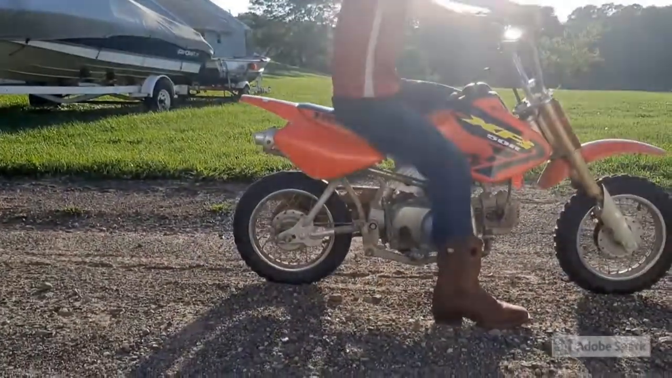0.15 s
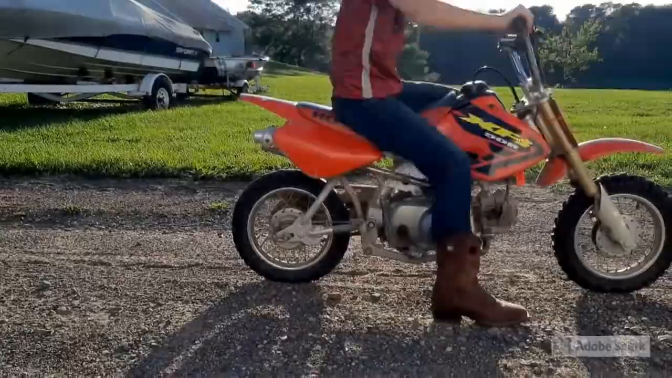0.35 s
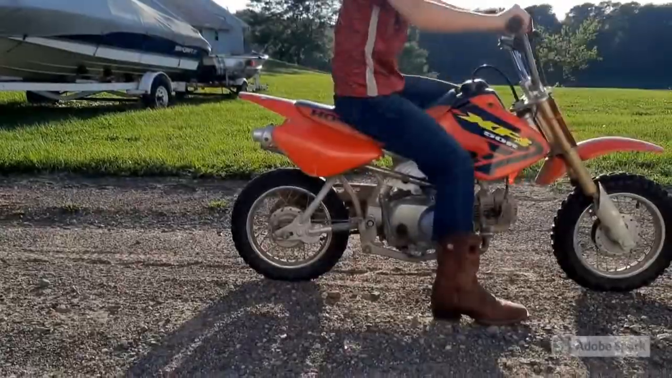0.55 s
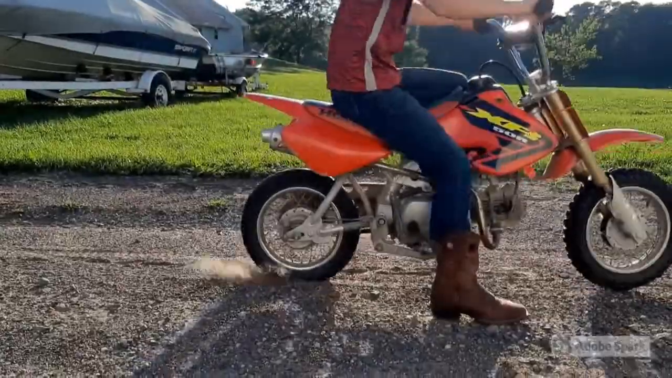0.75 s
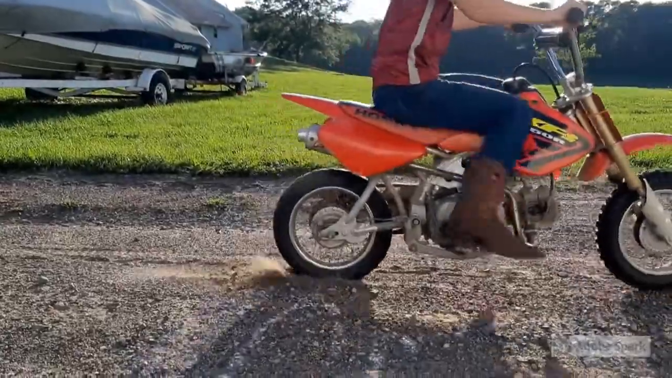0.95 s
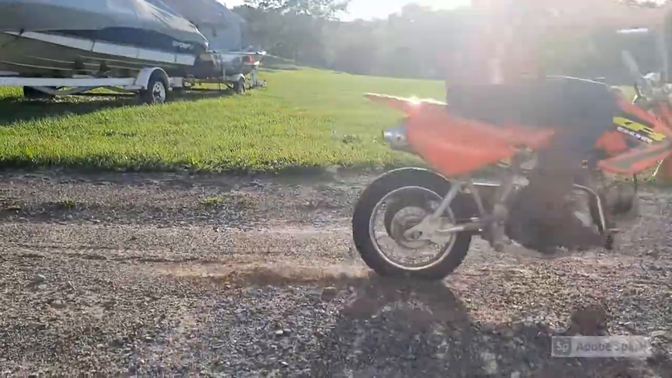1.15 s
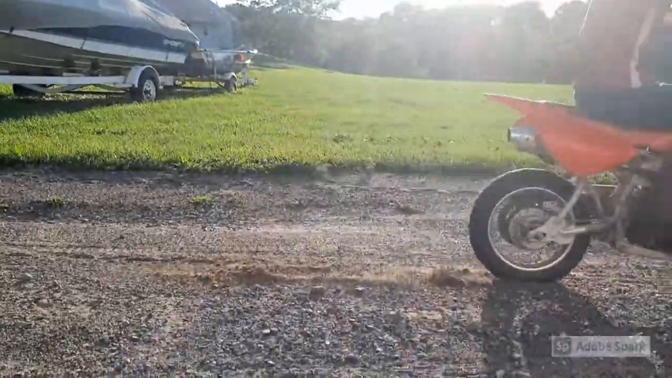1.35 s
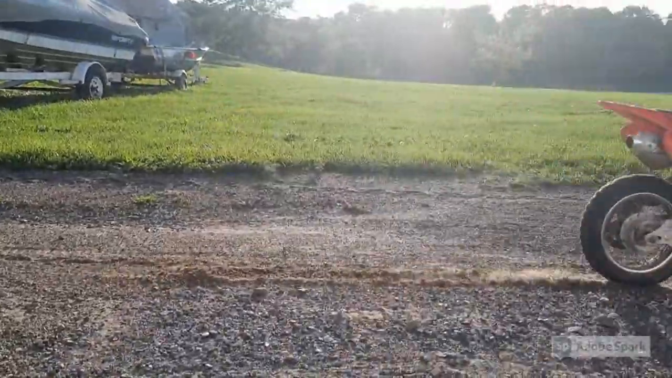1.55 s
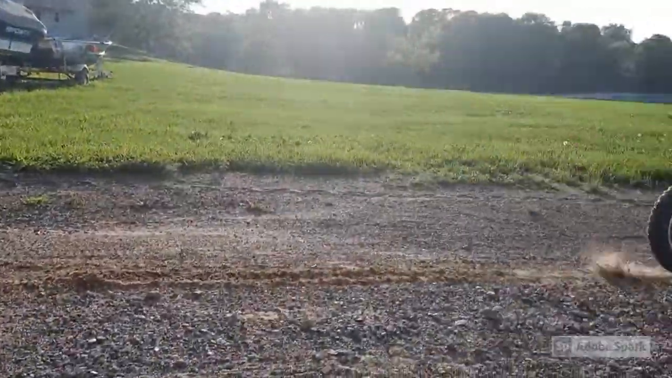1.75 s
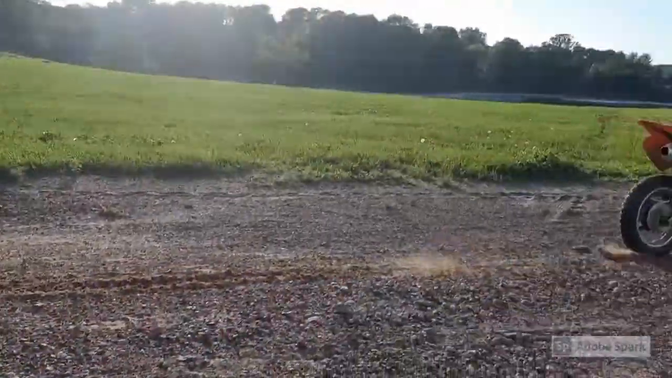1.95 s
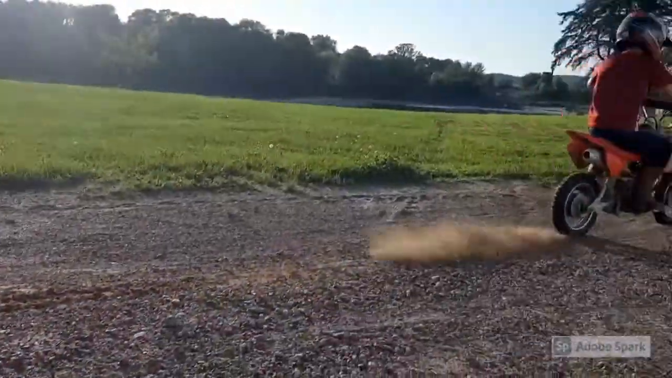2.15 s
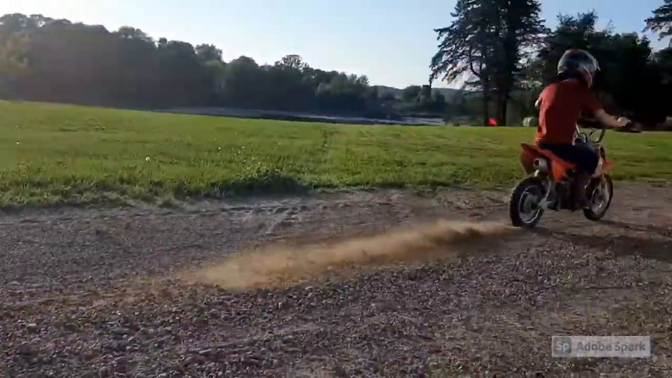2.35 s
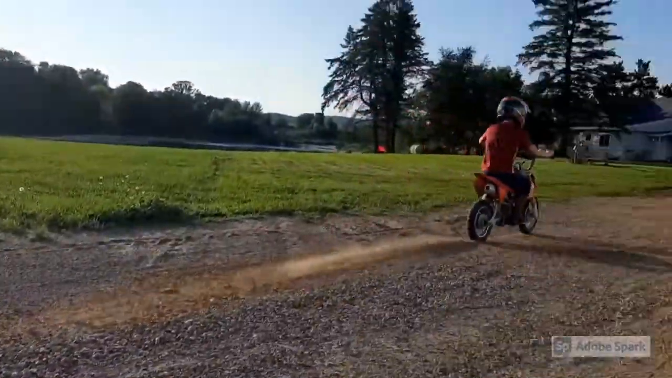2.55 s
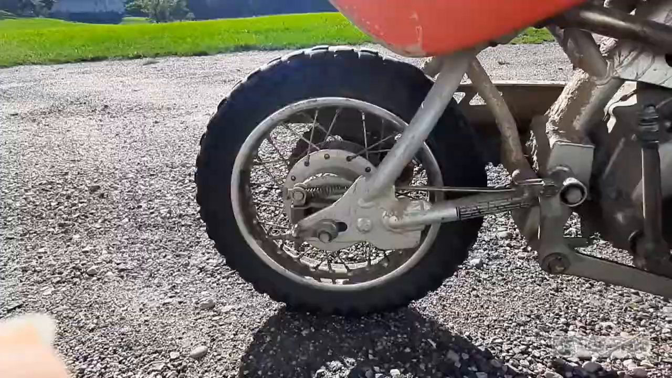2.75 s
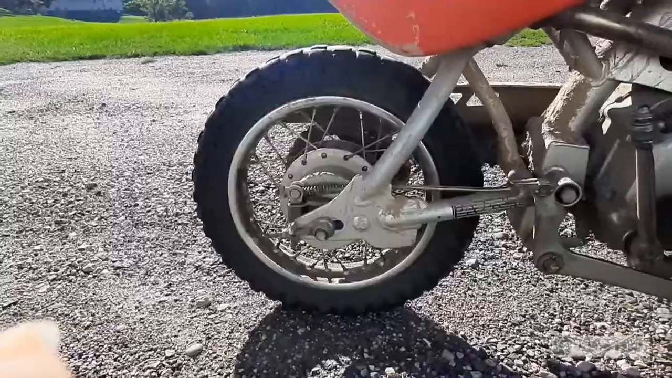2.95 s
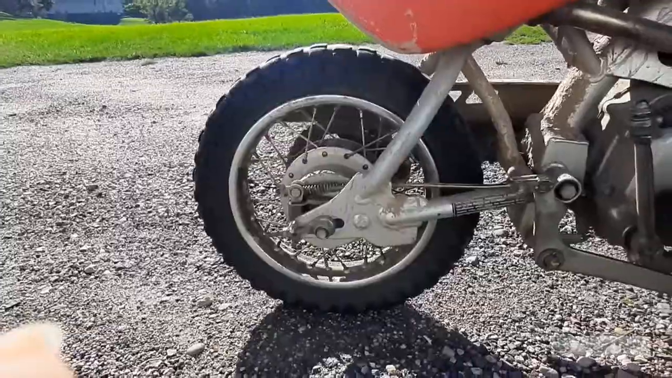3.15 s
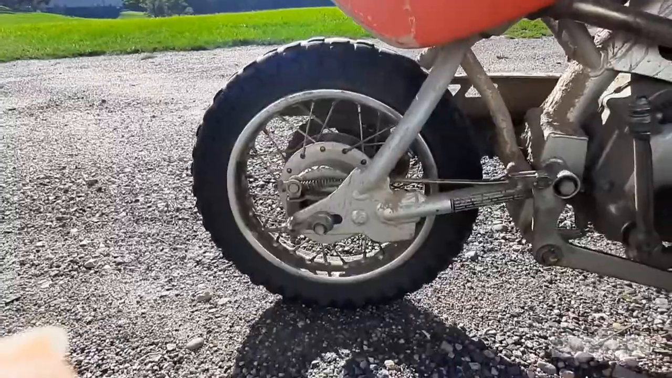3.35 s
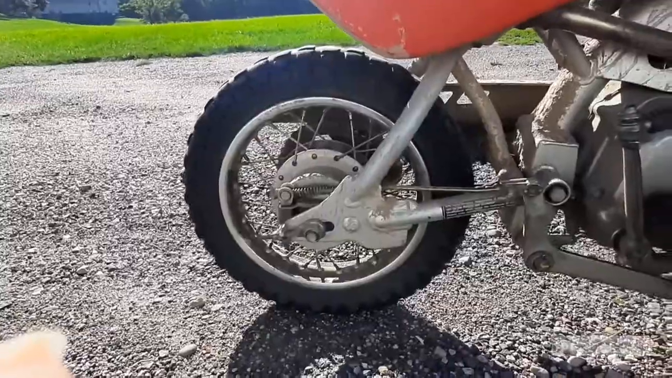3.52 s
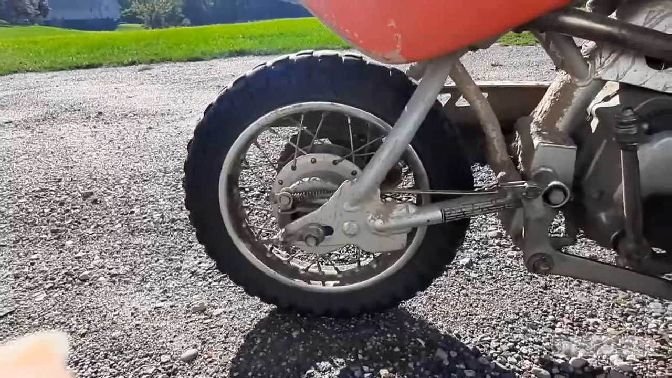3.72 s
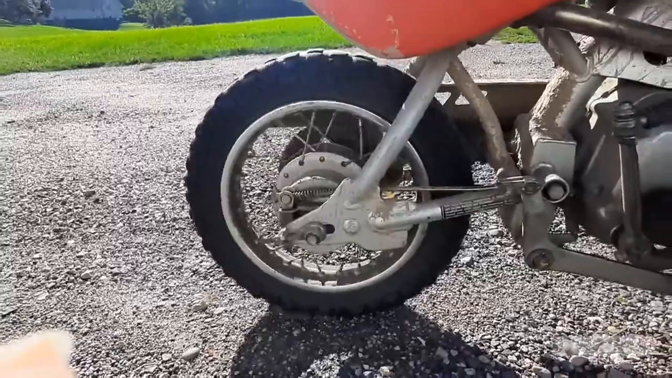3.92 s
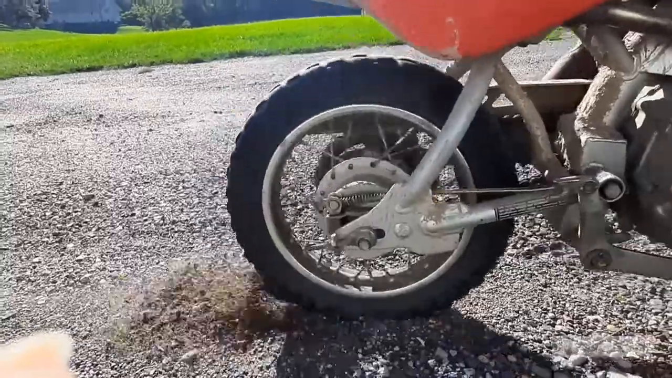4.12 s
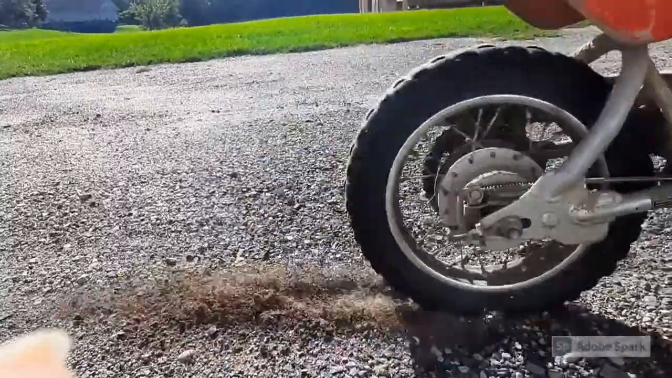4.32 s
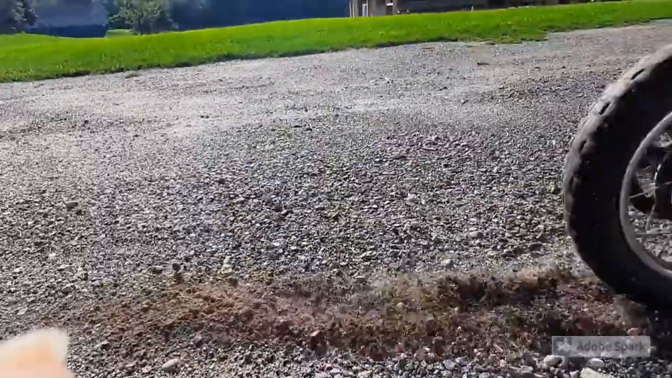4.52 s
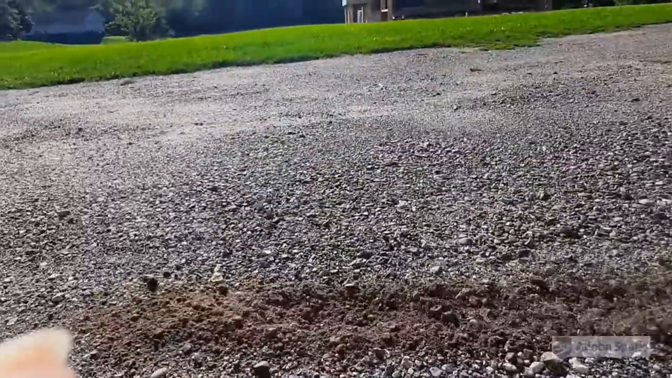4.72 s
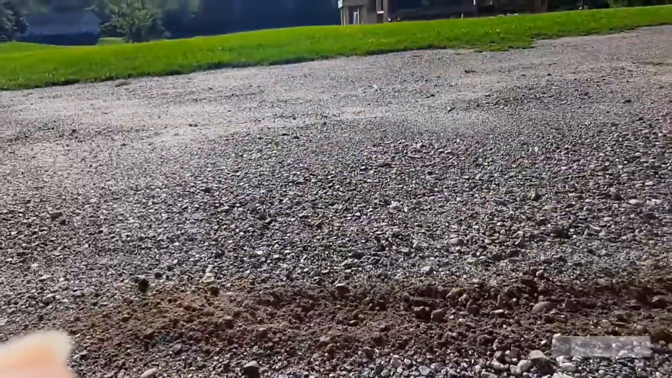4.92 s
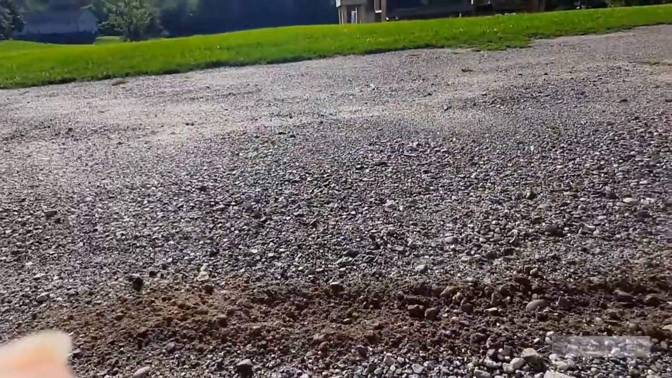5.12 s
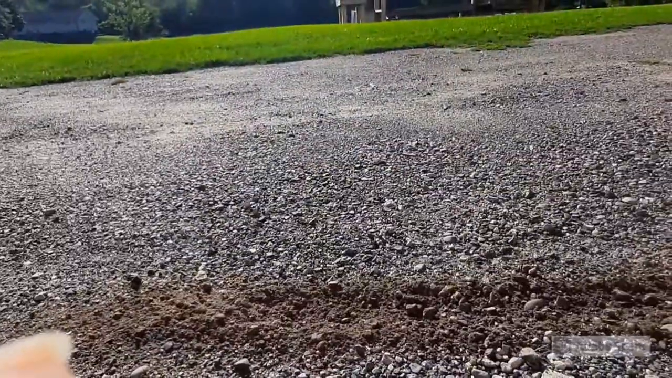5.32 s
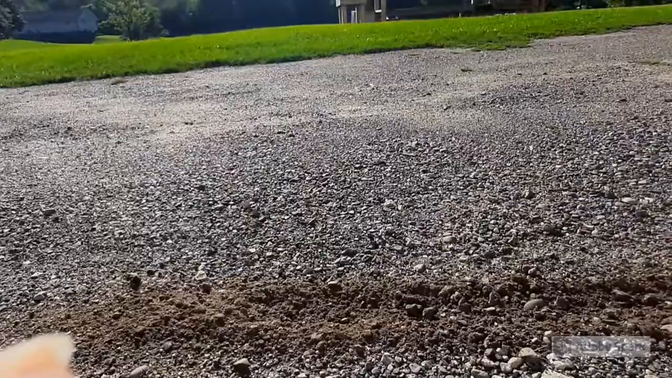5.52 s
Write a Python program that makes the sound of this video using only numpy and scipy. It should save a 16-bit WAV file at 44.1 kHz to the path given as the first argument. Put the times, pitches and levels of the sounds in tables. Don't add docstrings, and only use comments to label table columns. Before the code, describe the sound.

A small single-cylinder motorbike putters, revs up and pulls away over gravel, then after a tiny silence does it again from closer.

```python
import sys
import numpy as np
from scipy import signal
from scipy.fft import rfft, irfft, next_fast_len
from scipy.io import wavfile
from scipy.ndimage import uniform_filter1d, map_coordinates

SR = 44100
rng = np.random.default_rng(int(sys.argv[2]) if len(sys.argv) > 2 else 0)


def master_out(mix):
    frames = np.transpose(np.atleast_2d(mix))
    ceiling = np.clip(frames, -1, 1)
    pcm = np.round(ceiling * 32767).astype(np.int16)
    wavfile.write(sys.argv[1], SR, pcm)


def decibels_to_gain(level_db):
    exponent = np.asarray(level_db, float) / 20
    return 10 ** exponent


N = 250047

# [t/s, firing rate/Hz]
SPEED = [
    [(0, 17.746), (.204, 18.54), (.746, 45.117), (1.04, 52.635), (1.647, 64.236), (1.961, 77.638),
     (2.102, 69.51), (2.421, 64.613), (2.75, 61.908)],
    [(2.78, 14.624), (2.98, 12.297), (3.309, 22.977), (3.839, 49.26), (4.268, 54.446), (4.826, 65.29),
     (4.955, 60.536), (5.257, 53.759), (5.67, 53.375)],
]
# [t/s, distance/m]
DISTANCE = [(0, 2.1), (1.15, 2.3), (1.4, 2.9), (2, 3.48), (2.4, 4.94), (2.76, 6.75), (2.77, 1.94),
            (3.6, 1.31), (4.1, 2.36), (4.5, 2.76), (4.85, 3.84), (5.3, 6.86), (5.67, 7.3)]
# [start/s, end/s]
SILENCE = (2.75, 2.781)


def evened(x):
    return x / np.sqrt(np.mean(x ** 2) + 1e-20)


def read(points, hz):
    f, value = np.transpose(points)
    return np.interp(np.log(hz + 1), np.log(f + 1), value)


def over_time(rows):
    t, *values = np.transpose(rows)
    return [np.interp(np.arange(N) / SR, t, v) for v in values]


def add(mix, at, sound):
    part = mix[at:][:len(sound)]
    part += sound[:len(part)]


def rings(modes, t):
    return sum(decibels_to_gain(db) * np.exp(-np.pi * width * t) * np.sin(2 * np.pi * hz * t) for hz, width, db in modes)


def noise(shape, patchy_db):
    # [f/Hz, correlation 0-1]
    likeness = [(60, .9), (400, .9), (1000, .7), (2400, .4), (5000, .3), (8000, .75), (15000, .7)]
    hz = np.fft.rfftfreq(512, 1 / SR)
    a, b, c, d, patches = rng.standard_normal((N // 128 + 5, 257, 5)).T
    patches = evened(uniform_filter1d(uniform_filter1d(patches, 6, 0), 14, 1))
    same = np.clip(read(likeness, hz), -1, 1)[:, None]
    left = a + 1j * b
    right = same * left + np.sqrt(1 - same ** 2) * (c + 1j * d)
    z = np.array([left, right]) * decibels_to_gain(read(shape, hz)[:, None] + patchy_db * patches)
    return evened(signal.istft(z, nperseg=512, noverlap=384)[1][:, :N])


def control(name):
    # [t/s, firing rate gained/Hz, half width/s]
    lurches = [
        (.884, 4.21, .067),
        (.969, -2.21, .036),
        (4.129, -1.99, .064),
        (5.424, 1.86, .091),
    ]
    # [t/s, throttle 0-1]
    wrist = [(0, 0.62), (.3, 0.78), (.45, 0.29), (.8, 0.74), (1.3, 0.6), (1.95, 0.29), (2.15, 0.38),
             (2.76, 0.58), (2.77, 0.3), (2.98, 0.36), (3.04, 0.73), (3.4, 0.75), (3.65, 0.43), (3.86, 0.76),
             (4.3, 0.76), (4.85, 0.47), (5.67, 0.65)]
    # [start/s, end/s, throttle left 0-1, thump/dB]
    snapped_shut = [
        (3.887, 3.97, .08, -1.5),
        (4.89, 5.325, .21, -.5),
    ]
    # [t/s, level re full charge/dB]
    chugs = [
        [(0, -17.5), (.063, -17), (.12, -18), (.175, -7), (.227, -1.5)],
        [(2.78, -22), (2.817, -5.5), (2.89, -13.5), (2.97, -11)],
    ]
    # [t/s, level/dB, half width/s]
    wheelspin = [
        (.45, 4, 0.19),
        (.97, 2.5, 0.049),
        (2.05, 4, 0.047),
        (2.94, 5.5, 0.073),
        (3.47, 3.5, 0.1),
        (3.94, 12.5, 0.036),
        (4.1, 6, 0.086),
        (4.8, 3.5, 0.33),
        (5.24, 9, 0.02),
        (5.42, 2, 0.035),
    ]
    # [firing rate/Hz, level re thump/dB]
    front_law = [(14, -48), (21, -34), (28, -15), (36, -14.5), (44, -7), (52, -3.5), (60, -0.5), (75, -2.5)]
    rasp_law = [(14, -26), (38, -26.5), (45, -19), (55, -16), (65, -12), (76, -10.5)]
    # [firing rate/Hz, level at 2 m/dB]
    hiss_law = [(14, -59), (22, -59), (35, -55.5), (50, -48), (65, -44.5), (76, -43)]
    thump_at_1m_db = -17
    snap_s, blowdown_db, blowdown_s = .006, 4, 0.32
    shut_rasp_db, shut_hiss_db, full_front_throttle = -10.5, -7, 1.17
    by_tyre_db, first_hush_db, hiss_fade = 4.5, -5.5, 0.76

    t = np.arange(0, N / SR, .002)

    def curve(rows):
        return np.interp(t, *np.transpose(rows))

    def bumps(rows):
        return sum(size * np.exp(-((t - s) / width) ** 2) for s, size, width in rows)

    speed = curve(np.concatenate(SPEED)) + bumps(lurches)
    snaps = np.array([np.clip(np.minimum(t - a, b - t) / snap_s / 2 + .5, 0, 1) for a, b, *_ in snapped_shut])
    shut = snaps.sum(axis=0)
    start, _, left, shut_db = np.transpose(snapped_shut)
    blowdown = sum(blowdown_db * np.exp(-abs(t - a) / blowdown_s) for a in start) * shut + shut_db @ snaps
    weak = sum(curve([(rows[0][0] - .01, 0)] + rows + [(rows[-1][0] + .07, 0)]) for rows in chugs)
    far = 20 * np.log10(curve(DISTANCE))
    spin = bumps(wheelspin)
    full = thump_at_1m_db - far + weak
    hush = np.where(t > SILENCE[0], by_tyre_db, first_hush_db * np.clip(-weak / 10, 0, 1))
    front_shut = 20 * np.log10(left / full_front_throttle) @ snaps
    rasp_shut = shut_rasp_db * uniform_filter1d(shut, size=20)
    hiss_shut = shut_hiss_db * uniform_filter1d(shut, size=50)
    values = {
        "speed": speed,
        "thump": full + blowdown,
        "throttle": np.clip(curve(wrist), 0, 1) * (1 - shut) + left @ snaps,
        "front": full - .5 * weak + read(front_law, speed) + front_shut,
        "rasp": full - 0.22 * weak + read(rasp_law, speed) + rasp_shut + .6 * spin,
        "hiss": read(hiss_law, speed) - hiss_fade * (far - 6) + hush + hiss_shut + spin,
    }
    return np.interp(np.arange(N) / SR, t, values[name])


def crank():
    cycle_at_start = (.852, .451)
    turns = np.cumsum(control("speed")) / SR
    restart = round(SPEED[1][0][0] * SR)
    turns[restart:] += np.ceil(turns[restart]) - turns[restart] + cycle_at_start[1] - cycle_at_start[0]
    return turns + cycle_at_start[0]


def thump(period, hz, throttle):
    t = np.arange(2600) / SR
    shut = 1 / (1 + np.exp(-(t - .0045 - 0.2 * period) / 0.0011))
    burning = np.clip(3 * throttle, 0, 1)
    sweep = 1 + (1.32 + 0.89 * burning) * np.exp(-t / (.0026 - 0.0015 * burning))
    base_hz = hz * (1.07 - 0.069 * burning) * (1.1 - 0.17 * throttle)
    pitch_hz = base_hz * sweep * (1 - (0.0063 + 0.3 * throttle) * shut)
    rise = (1 - np.exp(-t / .0015)) ** 1.2
    size = rise * (1 - (0.53 + 0.43 * throttle) * shut) * np.exp(-t / (0.02 + 0.053 * period))
    wave = size * np.sin(2 * np.pi * np.cumsum(pitch_hz) / SR + .1 + .5 * burning)
    return wave / np.linalg.norm(wave)


def exhaust(turns):
    # [firing rate/Hz, f/Hz]
    pipe = [(13, 120), (22, 145.2), (33, 156.8), (55, 140.5), (75, 158)]
    # [firing rate/Hz, f/Hz]
    chamber_hz = [(15, 720), (55, 480), (64, 500), (70, 550), (77, 606)]
    # [f/Hz, width/Hz, level/dB]
    outlet = [(278, 270, -18.5), (538, 43, -10.5), (674, 196, 8), (940, 96, -0.5), (1390, 32, -26)]
    shell = [(2256, 860, 9.5), (2550, 560, 0), (2970, 880, 8), (3770, 150, -11.5), (4810, 550, -2)]
    at = np.flatnonzero(np.diff(np.floor(turns)) > 0)
    period = 1 / control("speed")[at]
    thump_db, front_db, rasp_db, throttle = (control(k)[at] for k in ("thump", "front", "rasp", "throttle"))
    chance = rng.standard_normal((len(at), 5))
    t = np.arange(900) / SR
    out = np.zeros(N)
    for k, i in enumerate(at):
        energy = np.sqrt(period[k] * SR)
        rate = 1 / period[k]
        burning = np.clip(3 * throttle[k], 0, 1)
        i = max(i + round(.8 * chance[k, 0]), 100)
        lazy = round(115 * (1 - burning))
        pop_db = .25 * chance[k, 1] - 3.5
        boom = thump(period[k], read(pipe, rate), np.clip(throttle[k], 0, 1))
        add(out, i - 85 + lazy, energy * decibels_to_gain(thump_db[k] + pop_db) * boom)
        chamber = (read(chamber_hz, rate), 70, 2)
        front = rings(outlet + [chamber], t * (1 + .003 * chance[k, 2]))
        add(out, i - 45 + lazy, energy * decibels_to_gain(front_db[k] + pop_db) * front / np.linalg.norm(front))
        rasp = rings(shell, t * (1 + .01 * chance[k, 3])) * (1 - np.exp(-t / 0.00054))
        uneven = decibels_to_gain(1.0 * chance[k, 4] - 4.5)
        add(out, i - 40, energy * burning * uneven * decibels_to_gain(rasp_db[k]) * rasp / np.linalg.norm(rasp))
    return out


def gulps(turns):
    # [f/Hz, width/Hz, level/dB]
    intake_rings = [(139, 44, -5.5), (466, 60, -16)]
    level_db, late_s, idle_below_hz = -40, 0.01345, 26.7
    idling = np.clip((idle_below_hz - control("speed")) / 6, 0, 1)
    fired = (np.diff(np.floor(turns), prepend=0) > 0) * idling
    t = np.arange(2000) / SR
    ring = rings(intake_rings, t) * (1 - np.exp(-t / 0.0028))
    return decibels_to_gain(level_db + 20.5) * signal.oaconvolve(np.roll(fired, round(late_s * SR)), ring)[:N]


def pumping(turns):
    # [firing rate/Hz, level re thump/dB]
    swing = [(15, -45), (30, -30), (45, -32), (57, -44), (66, -41), (76, -39)]
    level_db = control("thump") + read(swing, control("speed"))
    return control("throttle") * decibels_to_gain(level_db) * np.sin(2 * np.pi * turns + 4.55)


def puffs(turns, decay_s):
    rate = control("speed")
    return np.exp(-((turns + 0.00096 * rate) % 1) / rate / decay_s)


def gas(turns):
    # [f/Hz, density/dB per Hz]
    rasp_shape = [(200, -14), (500, 1.5), (900, 2.5), (1200, -1), (1500, -1), (1750, 3), (2100, 2),
                  (2800, -3.5), (3700, -9.5), (5000, -26), (7000, -75)]
    case_shape = [(1250, -59), (1430, 10), (1510, 49), (1590, -10), (1800, -45)]
    rumble_shape = [(20, -20), (45, -4), (70, -2.5), (200, 5), (500, -10), (1200, -24)]
    rumble_db = -51
    beat = 1 + 1.26 * np.clip(3 * control("throttle"), 0, 1) * puffs(turns, decay_s=0.0018)
    rasp = decibels_to_gain(control("rasp") - 2) * evened(beat) * noise(rasp_shape, patchy_db=1.5)
    case_level = decibels_to_gain(-62.5 + 0.52 * (control("rasp") + 58.5)) * np.clip(control("speed") / 45, 0, 1)
    case = case_level * noise(case_shape, patchy_db=5.0)
    rumble = decibels_to_gain(rumble_db + .6 * (control("thump") + 28)) * noise(rumble_shape, patchy_db=1.6)
    return rasp + case + rumble


def valve_gear(turns):
    burst = np.exp(-(((turns % 1) - .8) / .06) ** 2)
    slow = np.clip(30 / control("speed"), 0, 1.3)
    return decibels_to_gain(control("rasp") + 5.5) * slow * burst


def clacks():
    # [t/s, peak level/dB, t60/s]
    knocks = [
        (0.7118, -32.5, 0.15),
        (1.7632, -32, 0.023),
        (3.922, -37, 0.073),
        (3.9614, -52, 0.053),
        (5.223, -43, 0.033),
    ]
    envelope = np.zeros(N)
    for s, db, t60 in knocks:
        add(envelope, round(s * SR), decibels_to_gain(db + 1.0 - 60 * np.arange(5000) / SR / t60))
    return envelope


def metal(turns):
    # [f/Hz, density/dB per Hz]
    knock_shape = [(500, -16), (1200, 7.5), (2500, -1), (4500, 5), (7500, -9.5), (8700, -18),
                   (11500, -11.5), (15500, -0.5), (16500, -40)]
    return (valve_gear(turns) + clacks()) * noise(knock_shape, patchy_db=1.8)


def intake(turns):
    band = signal.butter(2, [6700, 7200], "bandpass", fs=SR)
    whistle = signal.lfilter(*band, rng.standard_normal((N, 2)).T)
    gulp = np.exp(-(((turns % 1) - .5) / 0.11) ** 2)
    near = np.interp(np.arange(N) / SR, [2.75, 2.9, 3.4, 3.6], [0, 1, 1, 0])
    return decibels_to_gain(-46.5) * near * gulp * evened(whistle)


def hiss(turns):
    # [f/Hz, density/dB per Hz]
    hiss_shape = [(2060, -7), (3500, -0.5), (3750, -5.5), (4320, 2.5), (4840, 0.5), (5970, 0), (7410, 0),
                  (7900, -3), (8630, -22), (8860, -22.5), (11400, -7), (15100, -6.5), (16000, -51)]
    beat = 1 + 2.44 * puffs(turns, decay_s=0.0012)
    return decibels_to_gain(control("hiss") - 1.06) * evened(beat) * noise(hiss_shape, patchy_db=4.5)


def gravel():
    stones_per_s = 900
    size = decibels_to_gain(2.5 * np.minimum(rng.exponential(1, (N, 2)), 5)) * (rng.random((N, 2)) < stones_per_s / SR)
    tick = rings([(3230, 1000, -6), (5150, 950, 19), (6760, 680, 6.5), (11400, 1500, 20)], np.arange(200) / SR)
    spin = np.clip(control("speed") / 55, 0, 1) ** 2
    ticks = signal.oaconvolve(size.T + .5 * size.T[::-1], tick[None])[:, :N]
    return spin * decibels_to_gain(control("hiss") - 9.5) * evened(ticks)


def yard(x):
    taps = np.zeros((2, 4000))
    at = rng.integers(60, 4000, (60, 2)).T
    echoes = rng.choice([-1., 1.], at.shape) * decibels_to_gain(-60 * at / SR / 0.74)
    np.put_along_axis(taps, at, echoes, 1)
    return signal.fftconvolve(x[None], taps / np.linalg.norm(taps[0]), axes=1)[:, :N]


def ground(x, share):
    # [t/s, f/Hz]
    notch = [(0, 740), (.8, 636), (1.4, 607), (1.8, 690), (2.1, 907), (2.4, 1240), (2.76, 1390),
             (2.77, 390), (4, 382), (4.45, 367), (4.65, 403), (4.9, 640), (5.3, 1290), (5.67, 1530)]
    grazing_m = 9
    late = np.arange(N) - SR / 2 / over_time(notch)[0]
    copy = np.array([np.interp(late, np.arange(N), c) for c in x])
    share = 1 - (1 - share) * np.exp(-(over_time(DISTANCE)[0] - 2) / grazing_m)
    return (x + share * copy) / np.sqrt(1 + share ** 2)


def ports(x):
    # [t/s, left port lag/ms, left minus right/dB]
    bearing = [(0, -0.00053, -2), (.7, -0.13, -0.5), (1.2, 0.026, -1), (1.7, 0.21, -1.5), (2.74, 0.11, -1),
               (2.78, -0.16, 2), (3.8, -0.2, -3.5), (4.2, -0.13, 0.5), (4.7, 0.33, -3), (5.2, 0.29, -2.5),
               (5.67, 0.43, -3)]
    lag_ms, lean_db = over_time(bearing)
    lag = lag_ms * SR / 1000
    heard = [map_coordinates(x[k], [np.arange(N) - side * lag / 2], order=3) * decibels_to_gain(side * lean_db / 2)
             for k, side in enumerate((1, -1))]
    return np.array(heard)


def scene():
    turns = crank()
    pops = exhaust(turns) + gulps(turns)
    bounced = ground(pops + decibels_to_gain(-24) * yard(pops), share=.62) + ground(gas(turns) + metal(turns), share=.15)
    return ports(bounced + intake(turns) + pumping(turns)) + hiss(turns) + gravel()


def roll_off(x):
    return signal.sosfilt(signal.butter(12, 16730, fs=SR, output="sos"), x)


def record(dry):
    # [f/Hz, left minus right/dB]
    port_lean = [(60, -2), (400, 1), (1000, 0), (2000, 1), (4500, 4), (8000, 2), (13000, 2.5)]
    size = next_fast_len(N)
    lean = decibels_to_gain(np.outer([.5, -.5], read(port_lean, np.fft.rfftfreq(size, 1 / SR))))
    x = irfft(rfft(dry, size) * lean, size)[:, :N]
    x = signal.oaconvolve(x, signal.firwin(511, 15850, window=("kaiser", 9), fs=SR)[None], "same")
    x = signal.lfilter(*signal.butter(2, 48, "highpass", fs=SR), x)
    x = .3 * np.tanh(x / .3)
    t = np.arange(N) / SR
    gate = np.clip(np.maximum(SILENCE[0] - t, t - SILENCE[1]) / .003, 0, 1)
    return roll_off(x * gate)


dry = scene()
out = record(dry)
master_out(out)
```